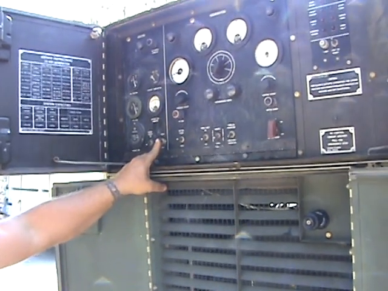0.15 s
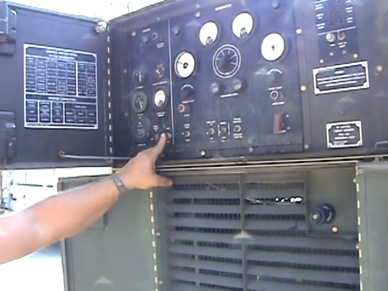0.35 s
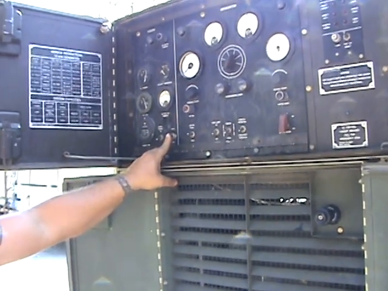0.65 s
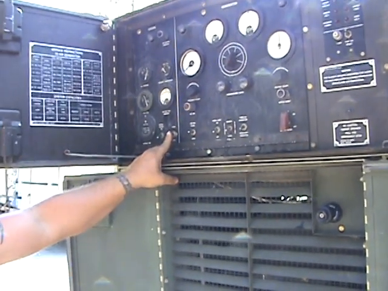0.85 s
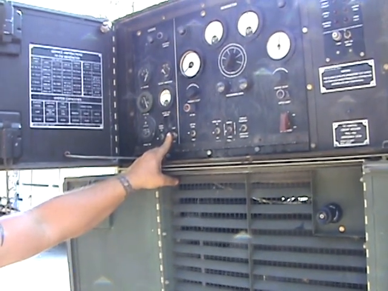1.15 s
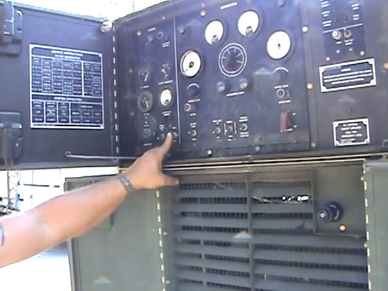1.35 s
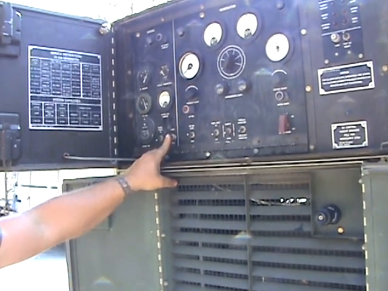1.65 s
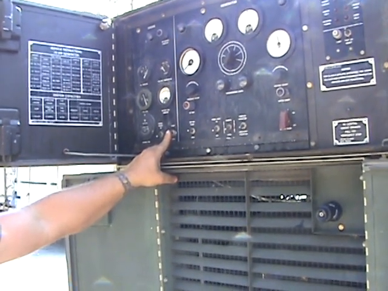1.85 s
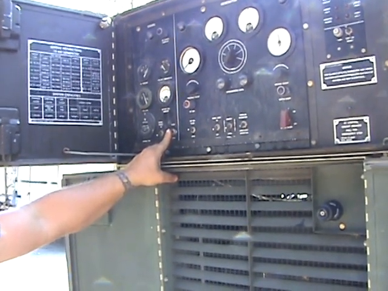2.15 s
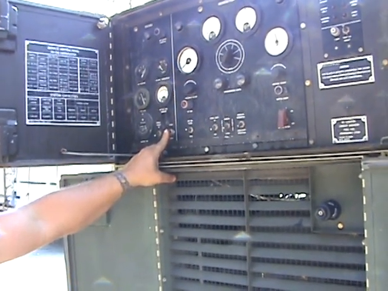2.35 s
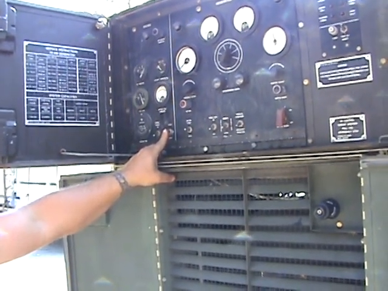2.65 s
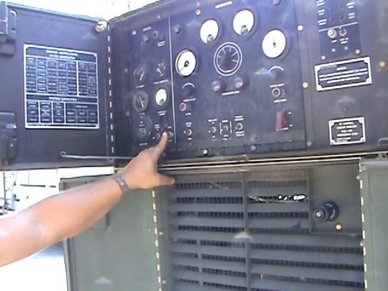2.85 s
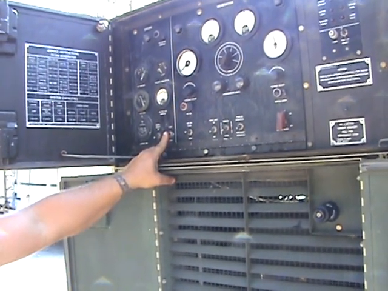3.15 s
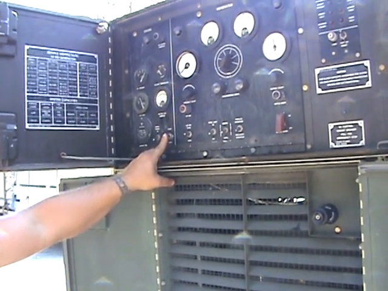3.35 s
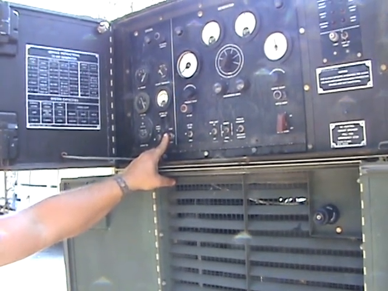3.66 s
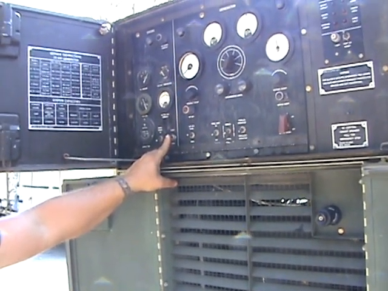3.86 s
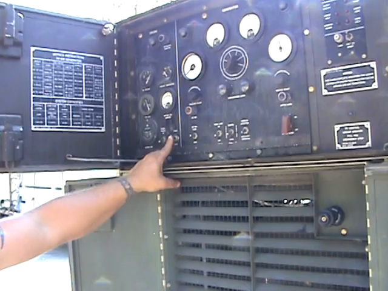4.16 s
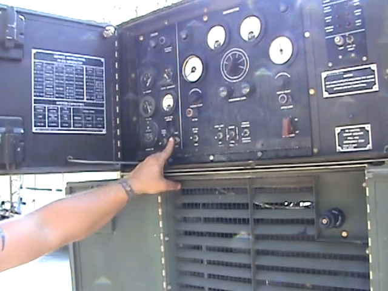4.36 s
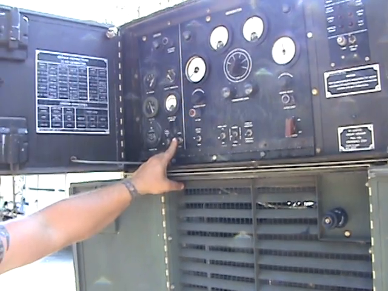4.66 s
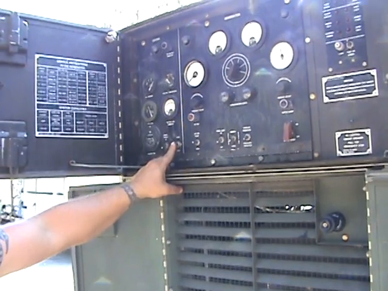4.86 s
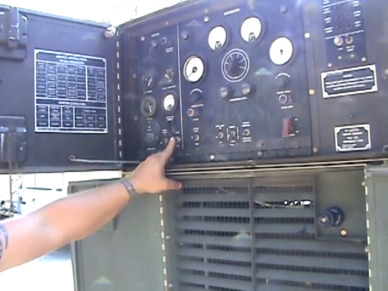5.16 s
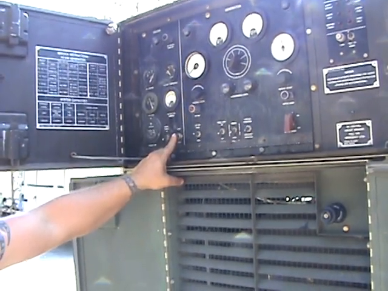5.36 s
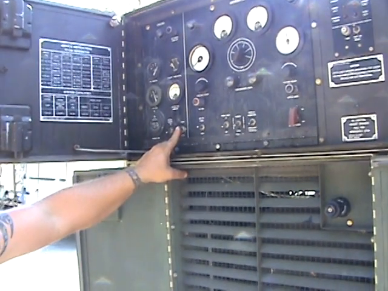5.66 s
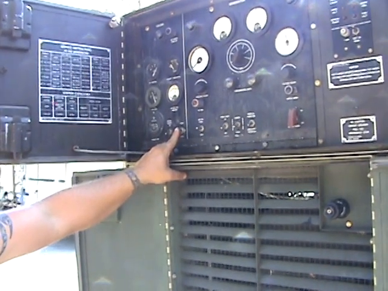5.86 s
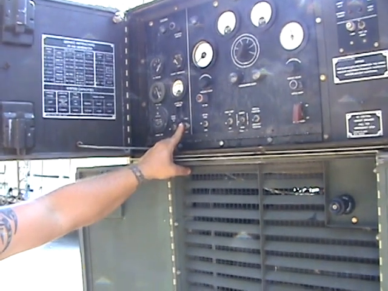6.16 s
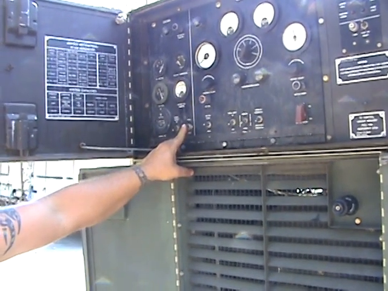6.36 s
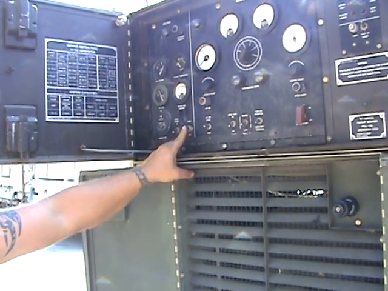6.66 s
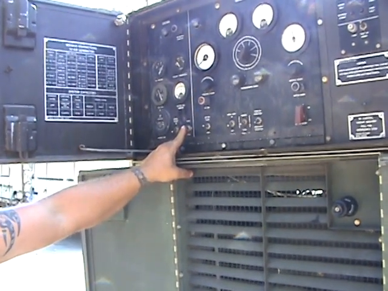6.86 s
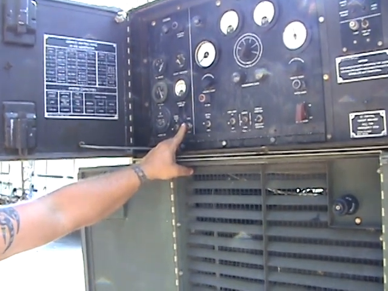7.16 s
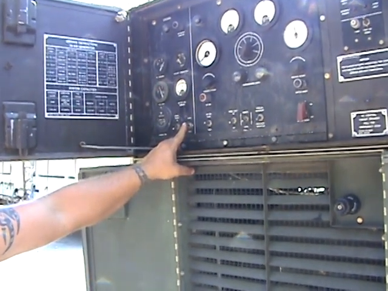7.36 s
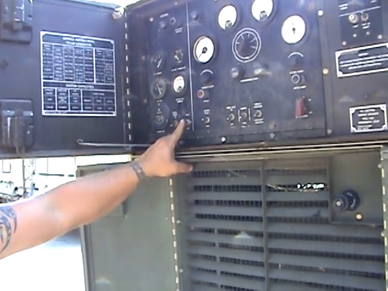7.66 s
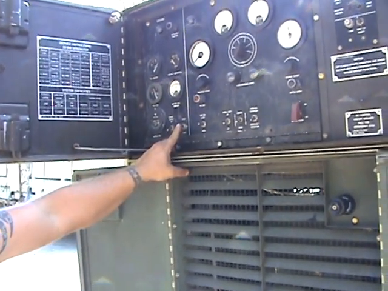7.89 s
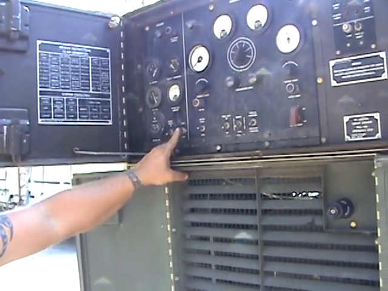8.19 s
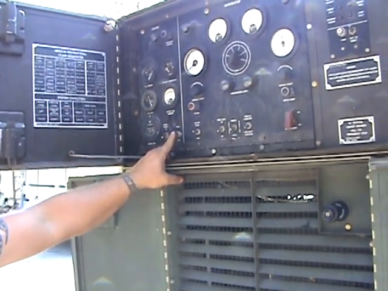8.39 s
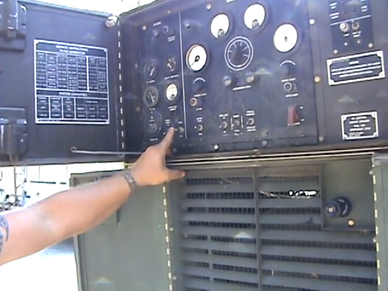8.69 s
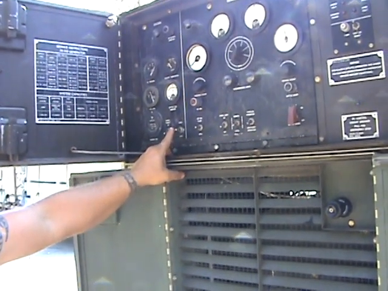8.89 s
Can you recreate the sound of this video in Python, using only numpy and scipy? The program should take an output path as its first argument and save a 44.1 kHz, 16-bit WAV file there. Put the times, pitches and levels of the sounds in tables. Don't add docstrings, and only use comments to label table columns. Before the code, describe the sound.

Loud engine noise fills everything: a low buzzing exhaust drone, beating fan tones, rattling gears, valves and pistons in a fast repeating pattern. Speed jumps up at first, sags back and locks steady by two seconds. The running then barely changes, except for a bright two-part electrical snap after five seconds. Near, dense, outdoor sound on a small stereo microphone, peaks flattened, bass leaning right.

```python
import sys
import numpy as np
from scipy import signal
from scipy.fft import rfft, irfft
from scipy.io import wavfile
from scipy.ndimage import uniform_filter1d

SR = 44100
rng = np.random.default_rng(int(sys.argv[2]) if len(sys.argv) > 2 else 0)


def linear_from_db(decibels):
    return 10 ** (np.asarray(decibels, float) / 20)


def dump(signal):
    limited = np.clip(np.atleast_2d(signal).T, -1, 1)
    pcm = np.round(limited * 32767).astype(np.int16)
    wavfile.write(sys.argv[1], SR, pcm)


N = 398223
HZ = np.fft.rfftfreq(N, 1 / SR)
TIME = np.arange(N) / SR


def level(x, db):
    return x * linear_from_db(db) / np.sqrt(np.mean(x ** 2))


def curves(table):
    s, *columns = np.transpose(table)
    return [np.interp(TIME, s, c) for c in columns]


def over_hz(table):
    hz, value = np.transpose(table)
    return np.interp(np.log(HZ + 1), np.log(hz + 1), value)


def colour(x, table):
    return irfft(rfft(x) * linear_from_db(over_hz(table)), N)


def ring(x, hz, width_hz):
    r = np.exp(-np.pi * width_hz / SR)
    angle = 2 * np.pi * hz / SR
    return signal.lfilter([1 - r], [1, -2 * r * np.cos(angle), r * r], x) * np.sin(angle)


def drift(rate_hz):
    knots = rng.standard_normal(int(N / SR * rate_hz) + 2)
    return 1.6 * np.interp(TIME * rate_hz, np.arange(len(knots)), knots)


def blows(cycle, degrees, size, jitter_s, scatter_db):
    turn = np.arange(int(cycle[-1]) + 1)[:, None] + np.asarray(degrees) / 720
    chance = rng.standard_normal((2,) + turn.shape)
    chance = 3 * uniform_filter1d(chance, size=11, axis=1) + 0.25 * chance
    chance[0] *= 1 + 8 * np.exp(-turn / 7)
    at = np.interp(turn, cycle, np.arange(N)) + jitter_s * SR * chance[0]
    at = np.clip(at, 0, N - 2).ravel()
    size = (size * linear_from_db(scatter_db * chance[1]) * (turn < cycle[-1])).ravel()
    i = at.astype(int)
    return np.bincount(i, size * (i + 1 - at), N) + np.bincount(i + 1, size * (at - i), N)


# time in s, firing rate in Hz.
FIRING_RATE = [(0, 59.21), (0.1, 61.99), (0.3, 64.72), (0.6, 64.17), (0.8, 62.19), (1.2, 60.68),
               (1.65, 59.09), (2, 58.55), (2.8, 58.71), (3.8, 58.88), (4.8, 58.89), (5.2, 58.81),
               (6.3, 58.96), (9.03, 58.91)]


def firing_rate_hz():
    return curves(FIRING_RATE)[0]


# time in s, share of fuel cut 0-1.
FUEL_CUT = [(0.0, 0), (0.1, 0), (0.25, 0.58), (0.45, 0.6), (0.65, 0.98), (0.85, 0.75), (1.1, 0.27),
            (1.4, 0.32), (1.9, 0.06), (2.6, 0), (9.03, 0.11)]


def fuel_cut():
    return curves(FUEL_CUT)[0]


def fuelled(table):
    return [row[0] + row[1] * fuel_cut() for row in table]


# governed level in dB, change with fuel cut in dB, change while catching in dB.
HUM = [
    (-32.5, 7, 3),
    (-20, -6.5, -12),
    (-17, 0.5, -1.5),
    (-21, 7, -2),
]
HUM_SIGN = (-1, -1, 1, 1)
# frequency in Hz, gain in dB.
PIPE = [(118, 0.75), (123, -1), (128, 5), (176, -0.8), (184, 2.5), (236, 0.06), (244, -9), (257, -4)]
# multiple of four-stroke cycle rate, level in dB.
UNEVEN = [(7, -55), (8, -41.5), (9, -52), (10, -31), (11, -38), (13, -32.5), (14, -39.5), (15, -34),
          (16, -33.5), (17, -37), (20, -35), (22, -33.5), (25, -35), (27, -30.5), (28, -32.5), (29, -39),
          (32, -39), (33, -41), (34, -45), (35, -34), (36, -32.5), (38, -46), (39, -41), (42, -39),
          (45, -42), (48, -42.5), (49, -39), (54, -47.5), (60, -38)]


def exhaust(firing):
    catch_s, misfire_db = 0.051, -17
    out = 0
    pipe_hz, pipe_db = np.transpose(PIPE)
    for k, (db, sign, row) in enumerate(zip(fuelled(HUM), HUM_SIGN, HUM), 1):
        db = db + row[2] * np.exp(-TIME / catch_s)
        db = db + np.interp(k * firing_rate_hz(), pipe_hz, pipe_db)
        if k == 1:
            db = db + misfire_db * fuel_cut() ** 4
        phase = 2 * np.pi * k * firing - 0.3 + 0.22 * drift(9)
        out = out + sign * linear_from_db(db + 0.28 * drift(9)) * np.cos(phase)
    for k, db in UNEVEN:
        wobble = 2 * np.pi * rng.random() + 0.22 * drift(5)
        out = out + linear_from_db(db) * np.cos(2 * np.pi * k * firing / 6 + wobble)
    return np.sqrt(2) * out


# multiple of fan shaft rate, level in dB.
FAN = [(8, -33), (11, -31)]


def fan(firing):
    shaft = 0.36636 * firing
    return np.sqrt(2) * sum(linear_from_db(db) * np.cos(2 * np.pi * k * shaft) for k, db in FAN)


# time jitter in s, size scatter in dB, fresh noise under the blows in dB.
GEAR_PLAY = (4e-5, 1.6, -4)


def gear_rattle(cycle):
    place, side, size = rng.random((900, 3)).T
    size = np.sign(side - 0.5) * linear_from_db(-0.7 * np.log(1 - size))
    return level(blows(cycle, 720 * place, size, *GEAR_PLAY[:2]), 0)


# frequency in Hz, density in dB per Hz.
RUMBLE = [(25, -32), (50, -32), (75, -19), (120, -4.5), (250, -0.5), (330, 0), (450, -4.5), (600, -9),
          (800, -5.5), (1000, -37)]


def rumble(gears):
    return level(colour(level(gears, -6.5) + rng.standard_normal(N), RUMBLE), 0)


# crank angle in degrees, cold level in dB, warm level in dB.
KNOCKS = [
    (54.3, 2.5, -2),
    (228.2, 12.5, 7.5),
    (332, 5.5, 7),
    (444, 8, -5),
    (590, 0.5, -1),
    (667.4, 6, 14),
]
SLAPS = [
    (36.85, 3, 1),
    (124.1, 5, 7.6),
    (348, 5, 0.1),
    (396, 3, 3.4),
    (500.8, 6.5, 7.6),
    (632.7, 1, 1.9),
    (586, -2, 6.2),
]
VALVES = [
    (29.5, -24, -29),
    (107.7, 15, -17),
    (180.2, 13, -15),
    (244, 18, 25),
    (364, 17.5, 13.5),
    (468, 21, -10),
    (606, -22, -15),
    (632, -2, 10),
    (667, 13.5, 21),
]
# frequency in Hz, width in Hz, level in dB.
BLOCK = [
    (1001.5, 127.8, -1.5),
    (1171, 141.9, -2),
    (1670, 96, -5.5),
]
# start in s, end in s.
WARM_UP = (3.3, 8.9)
# time jitter in s, size scatter in dB, fresh noise under the blows in dB.
KNOCK_PLAY = (4e-5, 2.0, -11)


def piston_knock(cycle):
    jitter_s, scatter_db, noise_db = KNOCK_PLAY
    turn_s = np.interp(np.arange(int(cycle[-1]) + 1), cycle, TIME)[:, None]
    warm = np.interp(turn_s, WARM_UP, (0, 1))
    out = 0
    for table, (hz, width_hz, db) in zip((KNOCKS, SLAPS, VALVES), BLOCK):
        degrees, cold_db, warm_db = np.transpose(table)
        lead_deg = 720 * cycle[-1] / TIME[-1] / (np.pi * width_hz)
        size = linear_from_db(cold_db + warm * (warm_db - cold_db))
        hits = level(blows(cycle, degrees - lead_deg, size, jitter_s, scatter_db), 0)
        hits = hits + linear_from_db(noise_db + 10 * np.exp(-TIME / 0.5)) * rng.standard_normal(N)
        out = out + level(ring(ring(hits, hz, width_hz), hz, width_hz), db)
    return level(out, 0)


# crank angle in degrees, size in units of 2 dB.
TAPS = [(28, 4.2), (176, 1), (320, 4), (360, 4.1), (432, 2), (444, 1.2), (456, 2.7), (468, 5), (496, 5.5),
        (584, 5), (612, 4), (644, 5), (668, 2.7), (680, 1.4)]
# frequency in Hz, width in Hz, level in dB.
COVERS = [(683, 40, 1), (838, 104, -2.5), (986, 25, 6.5), (1063, 55, -4.5), (1110, 27, 6.5), (1215, 14, -1),
          (1490, 66, -12), (1679, 30, 4.5), (1870, 87, -4.5), (2030, 48, -6), (2190, 66, -4.5),
          (2480, 79, -8), (2733, 77, -16), (2837, 96, -6), (3310, 32, -14), (3570, 35, -9), (4240, 31, -1),
          (4690, 47, -9)]
# time jitter in s, size scatter in dB, fresh noise under the blows in dB.
TAP_PLAY = (3.5e-5, 2.5, -5)


def valve_taps(cycle):
    jitter_s, scatter_db, noise_db = TAP_PLAY
    degrees, db = np.transpose(TAPS)
    lead_deg = 2.02
    noise = rng.standard_normal(N)
    out = 0
    for hz, width_hz, mode_db in COVERS:
        spot = linear_from_db(2 * db + 2.6 * rng.standard_normal(len(db)))
        hits = level(blows(cycle, (degrees - lead_deg) % 720, spot, jitter_s, scatter_db), 0)
        out = out + linear_from_db(mode_db) * ring(hits + linear_from_db(noise_db) * noise, hz, width_hz)
    return level(out, 0)


# frequency in Hz, density in dB per Hz.
CLATTER = [(550, -19), (700, -8), (880, -8.5), (1050, -5), (1340, -4), (1700, -3), (2500, -4.5), (3500, -8),
           (4500, -25.5), (7000, -35.5)]
# frequency in Hz, gain in dB.
BODY_FLOOR = [(250, -21), (650, -3.5), (800, 3), (20000, -12.5)]


def valve_clatter(cycle, gears, cover_db):
    mesh = gears + linear_from_db(GEAR_PLAY[2]) * rng.standard_normal(N)
    bending_s_per_khz = 0.0015
    mesh = irfft(rfft(mesh) * np.exp(1j * np.pi * bending_s_per_khz * HZ ** 2 / 1000), N)
    covers = sum(linear_from_db(db) * ring(mesh, hz, width_hz) for hz, width_hz, db in COVERS)
    ringing = level(covers, -4.5) + level(valve_taps(cycle), -10.5)
    return level(colour(mesh, CLATTER), -0.6) + linear_from_db(cover_db) * colour(ringing, BODY_FLOOR)


# crank angle in degrees, size in units of 2 dB.
TICKS = [(8, 6.2), (48, 1), (60, 1.5), (160, 1.2), (184, 3), (432, 2.3), (452, 3.1), (484, 8.8), (508, 7),
         (592, 2.4), (676, 7.6), (712, 2.2)]


def injector_ticks(cycle):
    degrees, db = np.transpose(TICKS)
    ticks = blows(cycle, degrees, linear_from_db(2 * db), jitter_s=5e-5, scatter_db=1.1)
    fade_s = 0.0081
    return ticks, signal.lfilter([1], [1, -np.exp(-1 / (fade_s * SR))], ticks)


# frequency in Hz, density in dB per Hz.
HISS = [(1500, -30), (2500, -12), (4000, 0), (5500, -4), (7500, -12), (9500, -19), (15500, -55)]


def tick_hiss(gears, ticks, spray):
    hiss = (rng.standard_normal(N) + 0.82 * gears) * (3.5 + level(spray, 1.5))
    return level(colour(level(hiss, 0) + level(ticks, -20), HISS), 0)


# governed level in dB, change with fuel cut in dB.
LOAD = [
    (-21, 1),
    (-17.5, -10),
    (-17.5, -1),
    (-26, -3),
    (0.4, -1.5),
]
# extra clatter in dB, fade in s.
STARTER = (1.9, 0.095)


def mechanics(cycle):
    rumble_db, knock_db, clatter_db, tick_db, cover_db = fuelled(LOAD)
    starter_db, starter_fade_s = STARTER
    gears = gear_rattle(cycle)
    ticks, spray = injector_ticks(cycle)
    clatter = valve_clatter(cycle, gears, cover_db) * (0.89 + level(spray, -15.5))
    clatter = clatter * linear_from_db(clatter_db + starter_db * np.exp(-TIME / starter_fade_s))
    bright = clatter + linear_from_db(tick_db) * tick_hiss(gears, ticks, spray)
    gust = linear_from_db(0.4 * drift(9))
    dull = linear_from_db(rumble_db - 1.5) * rumble(gears) + linear_from_db(knock_db - 1.5) * piston_knock(cycle)
    return dull + gust * bright


# frequency in Hz, density in dB per Hz.
AIR = [(5500, -23), (8000, -6.5), (11000, -6.5), (15500, -9)]
# level in dB, change with fuel cut in dB at once, in dB later, lag in s.
DRAUGHT = (-39.3, -6, -10, 0.3)
# time in s, gain in dB, half width in s.
SURGE = (2.2, 4.8, 0.27)


def draught(cycle):
    db, cut_db, late_db, lag_s = DRAUGHT
    surge_s, surge_db, half_width_s = SURGE
    puff = linear_from_db(0.86 * np.cos(2 * np.pi * (cycle - 0.85)) + 1.6 * drift(40))
    cut = fuel_cut()
    db = db + cut_db * cut + late_db * np.interp(TIME - lag_s, TIME, cut)
    db = db + surge_db * np.exp(-((TIME - surge_s) / half_width_s) ** 2)
    return level(colour(puff * rng.standard_normal(N), AIR), db + 2.3)


# time in s, peak in dB, t60 in s.
RELAY = [
    (5.1617, -12, 0.18),
    (5.1781, -6, 0.089),
]


def relay():
    envelope = 0
    for s, db, t60_s in RELAY:
        after_s = np.maximum(TIME - s, 0)
        envelope = envelope + linear_from_db(db - 9.5) * (TIME > s) * np.exp(-np.log(1000) * after_s / t60_s)
    snap = [(1200, -21), (2500, 7), (5500, 2), (8000, -6), (12000, -22), (16000, -35)]  # Hz, dB
    return envelope * level(colour(rng.standard_normal(N), snap), 0)


# frequency in Hz, left minus right in dB.
PORT_DB = [(60, -14), (110, -10.5), (200, -7.5), (380, -6), (700, -2), (1290, -2), (2380, -2.5),
           (4400, -2.5), (8120, -1.5), (15000, -1)]
# frequency in Hz, left lead in radians.
PORT_LEAD = [(0, -0.66), (520, 0.72), (950, 0.32), (2070, 0.21), (2410, 0.21), (6200, -0.33), (9300, 0.32),
             (15200, -0.11)]
# frequency in Hz, level in dB.
UNLIKE = [(40, -14), (150, -25), (400, -16), (700, -18), (1500, -16), (5000, -15), (9000, -13.5),
          (15000, -19)]


def ports(near):
    echo = rng.standard_normal(4096) * np.exp(-np.arange(4096) / (0.021 * SR))
    reflected = signal.fftconvolve(near, echo / np.linalg.norm(echo))[:N] * drift(40)
    unlike = rfft(reflected) * linear_from_db(over_hz(UNLIKE))
    direct = rfft(near)
    ratio = linear_from_db(over_hz(PORT_DB)) * np.exp(1j * over_hz(PORT_LEAD))
    right = 2 / (1 + ratio)
    return irfft([ratio * right * (direct + unlike), right * (direct - unlike)], N)


def scene():
    firing = np.cumsum(firing_rate_hz()) / SR
    cycle = firing / 6
    return ports(exhaust(firing) + fan(firing) + mechanics(cycle) + draught(cycle) + relay())


def low_pass(x):
    return signal.sosfilt(signal.butter(12, 15630, fs=SR, output="sos"), x)


# frequency in Hz, gain in dB.
MIC = [(20, 1), (45, 0.5), (8000, 0.5), (11000, -3.5), (15500, -12.5)]


def record(dry):
    soft = np.tanh(0.7 * dry) / 0.71
    mix = np.clip([colour(side, MIC) for side in soft], -1, 1)
    return low_pass(mix)


dry = scene()
out = record(dry)
dump(out)
```